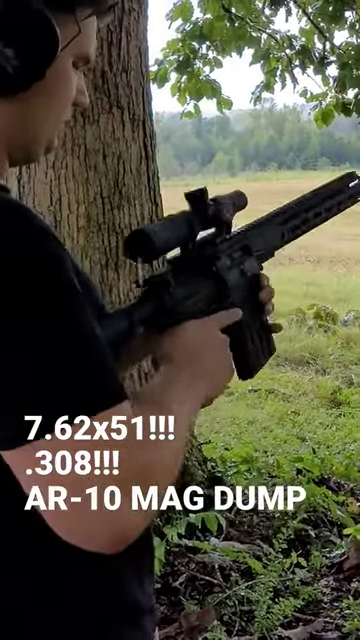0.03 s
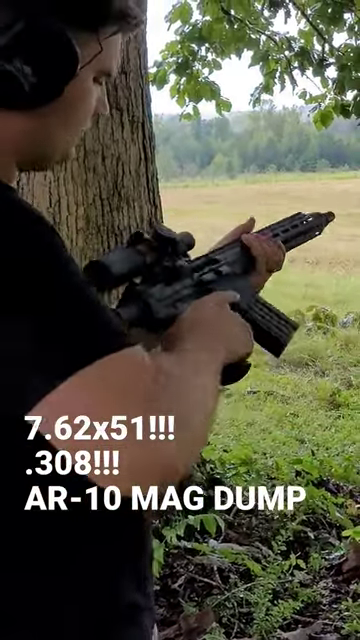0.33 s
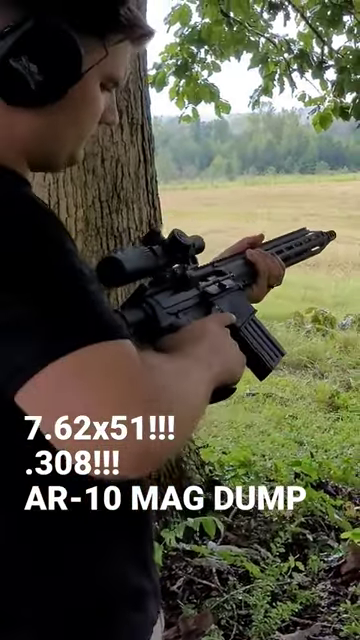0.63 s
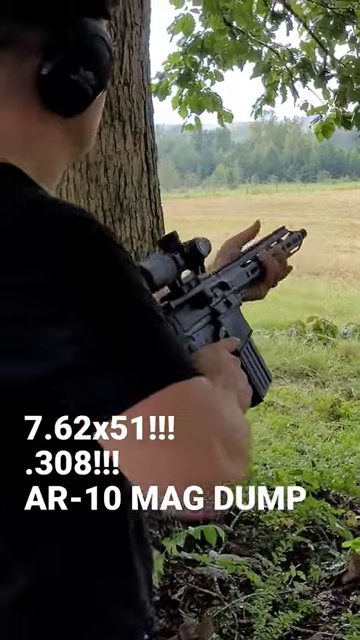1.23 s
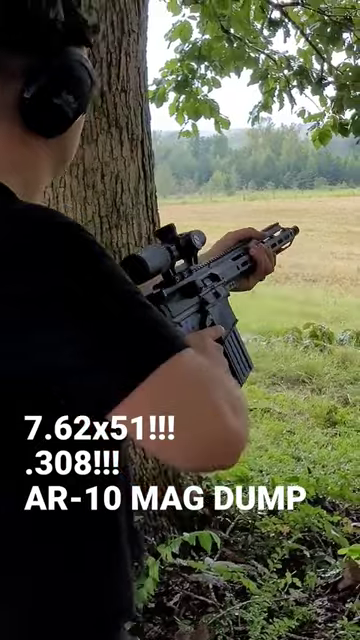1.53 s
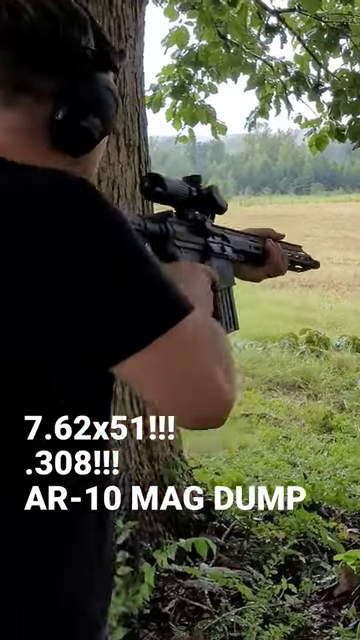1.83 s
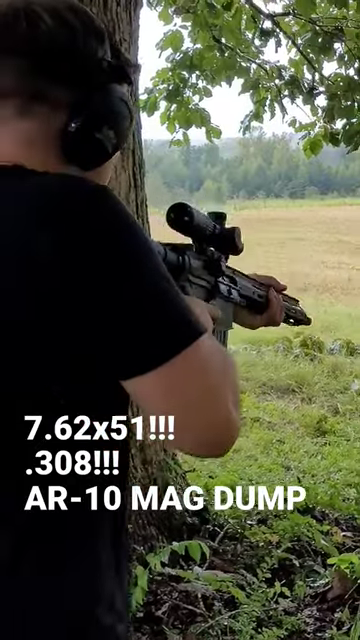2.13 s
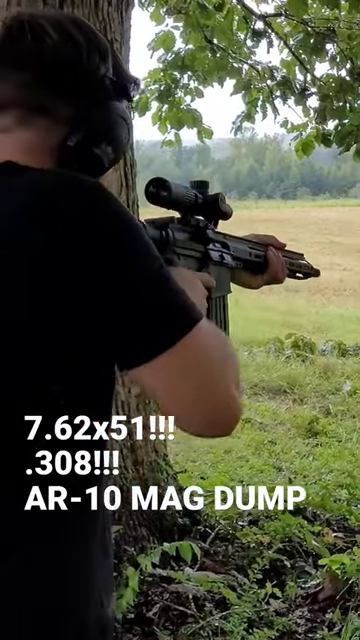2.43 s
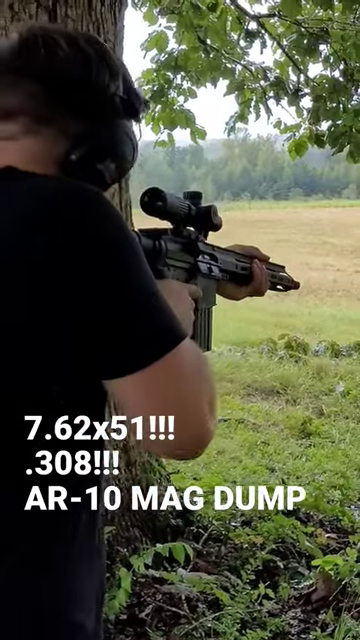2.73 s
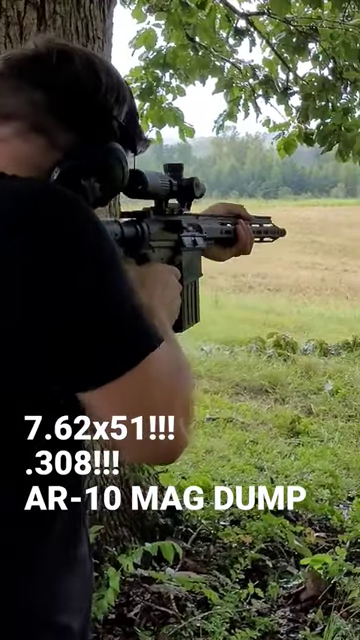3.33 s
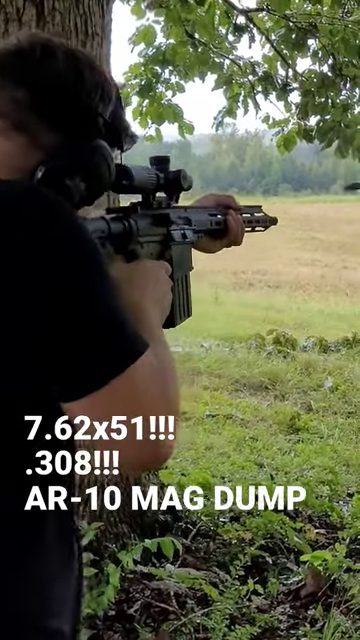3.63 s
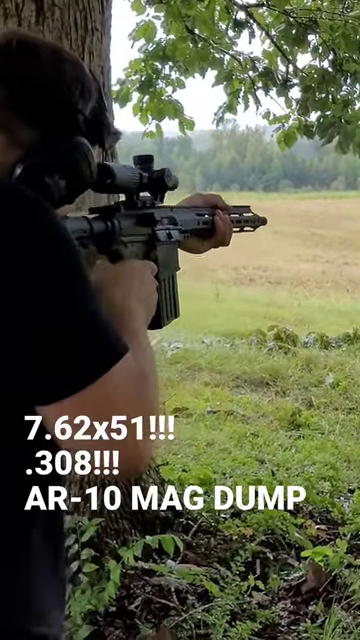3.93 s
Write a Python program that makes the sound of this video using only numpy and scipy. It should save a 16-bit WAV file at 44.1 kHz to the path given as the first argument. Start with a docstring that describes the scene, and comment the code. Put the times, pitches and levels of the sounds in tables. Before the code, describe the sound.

Five rapid rifle shots blast close by at the edge of a field, overloading the microphone. Before them, the bolt slams shut with a steel ring, followed by faint handling clicks and shirt rustle over quiet outdoor air.

```python
"""Five fast rifle shots, close by, under a tree at the edge of a field. Each blast comes back from
ground and trees as thumps, rumble and a dense roar, and overloads a microphone with two closely
spaced ports. Before the shots the bolt slams home and the steel rings, then hands and shirt shift
as the rifle is shouldered. Faint outdoor air lies under it all."""
import sys
import numpy as np
from scipy import signal
from scipy.fft import rfft, irfft
from scipy.io import wavfile

SR = 44100
rng = np.random.default_rng(int(sys.argv[2]) if len(sys.argv) > 2 else 0)


def master_out(mix):
    """Clip the mix to full scale and print it as 16-bit PCM to the path in sys.argv[1]."""
    frames = np.transpose(np.atleast_2d(mix))
    ceiling = np.clip(frames, -1, 1)
    pcm = np.round(ceiling * 32767).astype(np.int16)
    wavfile.write(sys.argv[1], SR, pcm)


N = 176400

# spectrum of the air over the field (frequency [Hz], level [dB])
AIR_SPECTRUM = [(15, -27), (25, -11.5), (69, 2.5), (119, -2), (281, -11.5), (782, -9.5), (970, -14.5),
                (1340, -11), (2300, -17.5), (6920, -26.5), (12500, -24), (14300, -25), (15500, -34)]
# level of the air, a little lower for a while after the bolt (time [s], level [dB])
AIR_LEVELS = [(.3, -51.5), (.6, -52), (.9, -52), (3.3, -50.5)]
# spectrum of hands and shirt (frequency [Hz], level [dB])
RUSTLE_SPECTRUM = [(150, -17), (500, -1), (1200, -1.5), (2400, 0), (4000, -2.5), (7000, -10.5), (10000, -7),
                   (15500, -28.5)]
# swells of the rustle (time [s], level [dB])
RUSTLE_LEVELS = [(.4, -76), (.5, -65), (.545, -50), (.6, -61), (.72, -59), (.82, -54), (.98, -55.5),
                 (1.06, -53.5), (1.19, -56), (1.27, -47.5), (1.39, -59), (1.49, -50.5), (1.56, -54.5),
                 (1.76, -56.5), (1.89, -48.5), (1.97, -52), (2.11, -57), (2.19, -45), (2.27, -53),
                 (2.54, -54.5), (2.63, -53.5), (2.72, -52), (2.96, -55), (3.04, -51.5), (3.15, -59),
                 (3.3, -52)]
# handling clicks (time [s], level [dB], centre [Hz], t60 [s], left minus right [dB])
HANDLING_CLICKS = [(0.3407, -30.5, 940, 0.0093, -6), (.343, -36.5, 330, 0.016, -7),
                   (.358, -44, 3000, .03, 0), (.7515, -40, 4540, .009, -3), (.805, -45.5, 1000, .02, 2),
                   (1.033, -36.5, 3420, .012, 3), (1.043, -47.5, 1500, .03, 2),
                   (1.121, -35, 3700, .014, -3), (1.262, -43, 2090, .06, 4), (1.267, -42, 9100, .06, -1),
                   (1.304, -42.5, 3500, 0.031, -5), (1.464, -45.5, 2200, .02, -2),
                   (1.857, -44, 1500, 0.033, 1), (1.885, -44, 1400, .05, 3), (2.196, -26, 1700, .014, -2),
                   (2.204, -42, 1500, .06, 0), (2.335, -41.5, 3470, .03, -2),
                   (2.467, -29, 1500, 0.011, 5.5), (2.6719, -38, 1900, .018, 0),
                   (3.026, -38.5, 8100, 0.05, -1), (3.238, -37.5, 1000, 0.013, -7),
                   (3.26, -43, 5500, 0.027, -1)]
# blows of the bolt: catch, cartridge feeding, lock-up (time [s], level [dB], t60 [s])
BOLT_BLOWS = [(.003, -7, 0.019), (.017, -17, 0.25), (.024, -14.5, 0.12), (0.0387, -10.5, 0.093),
              (.051, -17, 0.11), (.058, -18.5, 0.23), (0.11, -32, 0.14)]
# spectra of a blow's clash and its bright tail (frequency [Hz], level [dB])
CLASH_SPECTRUM = [(150, -24), (400, -21.5), (800, -5), (1200, -9), (1700, 2), (2700, 1), (4500, -1.5),
                  (6300, -3.5), (8000, -2), (11000, -4.5), (16000, -4.5)]
TAIL_SPECTRUM = [(500, -30), (1400, -21), (2200, -2.5), (5500, 2.5), (8000, -5.5), (15000, -7)]
# modes of the steel (frequency [Hz], level [dB], t60 [s])
STEEL_MODES = [(1820, -1, 0.1), (2330, -1.5, 0.14), (2630, -6, .22), (3055, -7, 0.23), (3704, -12.5, 0.52),
               (3946, -16, 0.49), (4170, -8.5, 0.25), (4600, -7, 0.17), (5238, -2, .5), (5510, -15, .2),
               (5740, -15, 0.63), (5997, -10, 0.52), (7680, -2, .12), (9790, -17, .2), (10627, -19, 0.42)]
# hollow knocks of magazine and stock (time [s], level [dB], frequency [Hz], t60 [s], rise [s])
HOLLOW_KNOCKS = [(.004, -25, 970, .04, .001), (.024, -20, 790, .08, .004), (.029, -10, 880, .016, .002),
                 (.042, -33, 560, .04, .003), (.064, -32, 380, .07, .004), (.0645, -35, 210, .025, .002)]
# the shots (time [s], level [dB], treble [dB], rise [s])
RIFLE_SHOTS = [(3.338, 1.5, 2, 0.015), (3.491, 0, -0.45, .002), (3.6493, 0, -0.5, 0.00084),
               (3.787, -1, 0.4, 0.0022), (3.945, -0.5, -1, 0.0024)]
# thumps of one blast and its echoes (delay [s], level [dB], centre [Hz])
BLAST_THUMPS = [(.009, -5.5, 219), (.0145, -18.5, 300), (0.0466, -5, 204), (.053, -18, 109),
                (0.0699, -12, 185), (.109, -13, 170), (0.1451, -9, 150)]
# spectra of the blast's low, middle and high layers (frequency [Hz], level [dB])
RUMBLE_SPECTRUM = [(18, -36), (32, -11), (52, 5.5), (68, 2.5), (88, 3), (120, -12), (170, 1), (230, 4.5),
                   (285, -7), (335, -1), (500, -12), (900, -25), (2000, -57)]
ROAR_SPECTRUM = [(200, -10.5), (450, 2), (800, 1), (1300, 2), (2300, -2.5), (3100, -2), (4500, -10.5),
                 (8000, -16.5), (16000, -30)]
CRACK_SPECTRUM = [(600, -30), (2000, -3.5), (3500, 3), (6000, 2), (9000, 1.5), (13000, 1), (16000, -1.5)]

PORT_LAG_S, CLICK_LAG_S = .00043, .0001  # right port behind left


def undb(db):
    return 10 ** (np.asarray(db) / 20)


def colour(x, points):
    """Filter by a spectrum of (frequency [Hz], level [dB]) points; rms 1."""
    hz, db = np.array(points, float).T
    f = np.maximum(np.fft.rfftfreq(x.shape[-1], 1 / SR), 1)
    gain = undb(np.interp(np.log(f), np.log(hz), db))
    filtered = irfft(rfft(x) * gain, x.shape[-1])
    return filtered / np.sqrt(np.mean(filtered ** 2))


def ports(x, lag_s):
    """The sound reaches the microphone's left port first."""
    return np.array([x, np.roll(x, int(lag_s * SR))])


def pan(db):
    return undb(np.array([[db], [-db]]) / 2)


def noise(points, alike, size, lag_s=PORT_LAG_S):
    """Coloured noise at both ports; the share 'alike' is common to them."""
    white = rng.standard_normal((3, size))
    return colour(np.sqrt(alike) * ports(white[2], lag_s) + np.sqrt(1 - alike) * white[:2], points)


def add(out, start, x):
    """Mix x in at start [s]."""
    i = int(start * SR)
    n = min(x.shape[-1], N - i)
    out[:, i:i + n] += x[..., :n]


def fade(t, t60):
    return np.exp(-np.log(1000) * t / t60)


def envelope(t, rise_s, hold_s, fall_db_s, build_db_s=0):
    """Rise to time 0, build through the hold, then die away."""
    attack = np.exp(-(np.minimum(t, 0) / rise_s) ** 2)
    build_db = -build_db_s * np.clip(hold_s - t, 0, hold_s)
    return attack * undb(build_db - fall_db_s * np.maximum(t - hold_s, 0))


def flutter(t, rate_hz):
    """Random values of spread near 1, joined by straight lines."""
    steps = rng.standard_normal(len(t) // 8)
    return 1.11 * np.interp(t * rate_hz, np.arange(len(steps)), steps)


def field_air():
    """Open air all round the microphone: a low rumble under faint hiss."""
    db = np.interp(np.arange(N) / SR, *np.array(AIR_LEVELS).T)
    return undb(db) * noise(AIR_SPECTRUM, alike=0.54, size=N)


def rustle():
    """Hands and shirt rub near the microphone, in millisecond grains of uneven strength."""
    grain = SR // 1000
    grain_db = 1.8 * np.minimum(rng.exponential(size=N // grain + 1), 4)
    grains = rng.standard_normal((2, N)) * undb(np.repeat(grain_db, grain)[:N])
    db = np.interp(np.arange(N) / SR, *np.array(RUSTLE_LEVELS).T)
    return undb(db) * colour(grains, RUSTLE_SPECTRUM)


def clicks():
    """The rifle's parts give short damped clicks, left and right, as it is shouldered."""
    age, out = np.arange(SR // 8) / SR, np.zeros((2, N))
    for start, db, hz, t60, pan_db in HANDLING_CLICKS:
        body = [(hz / 8, -20), (hz / 2, -3), (hz, 0), (hz * 1.26, -3), (hz * 2, -14), (hz * 6, -28)]
        click = noise(body, alike=0.43, size=len(age), lag_s=CLICK_LAG_S)
        decay = fade(age, t60) + undb(-25) * fade(age, t60=0.13)
        add(out, start, undb(db) * click * decay * pan(pan_db))
    return out


def bolt():
    """Each blow clashes, chatters, rings the steel and leaves a bright tail; hollow parts knock."""
    t, out = np.arange(SR) / SR, np.zeros((2, N))
    chatter_db, tail_db, steel_db = 3, -15, -16.5
    clash_rise_s, ring_rise_s = 0.00064, 0.0014
    attack = 1 - np.exp(-t / clash_rise_s)
    for start, db, t60 in BOLT_BLOWS:
        chatter = undb(chatter_db * flutter(t, rate_hz=695))
        clash = noise(CLASH_SPECTRUM, alike=0.13, size=SR, lag_s=CLICK_LAG_S) * fade(t, t60)
        tail = undb(tail_db) * noise(TAIL_SPECTRUM, alike=0.067, size=SR) * fade(t, t60=0.47)
        add(out, start, undb(db) * (clash * chatter * attack + tail) * pan(db=-1.5))
    for hz, mode_db, t60 in STEEL_MODES:
        energy = sum((undb(db) * envelope(t - start, ring_rise_s, 0, 60 / t60)) ** 2
                     for start, db, _ in BOLT_BLOWS)
        phase = rng.random() + 0.29 * rng.random((2, 1))  # in cycles, one for each port
        ring = np.sqrt(energy) * np.sin(2 * np.pi * (hz * t + phase))
        add(out, 0, undb(steel_db + mode_db) * ring)
    for start, db, hz, t60, rise in HOLLOW_KNOCKS:
        age = t - start
        add(out, 0, undb(db) * np.sin(2 * np.pi * hz * age) * envelope(age, rise, 0, 60 / t60))
    return out


def tree_scatter(points, same, alike):
    """Scattered noise for each shot; the share 'same' takes the same paths every time."""
    common = noise(points, alike, SR)
    return [np.sqrt(same) * common + np.sqrt(1 - same) * noise(points, alike, SR) for _ in RIFLE_SHOTS]


def thumps(age):
    """A blast and its echoes reach the microphone as pressure pulses, each a little uneven in level."""
    pulses, spread_db = 0, .8
    for delay, db, hz in BLAST_THUMPS:
        gain = undb(db + spread_db * rng.standard_normal())
        phase_squared = (np.pi * hz * (age - delay)) ** 2
        pulses += gain * (1 - 2 * phase_squared) * np.exp(-phase_squared)
    return ports(pulses, PORT_LAG_S)


def shots():
    """Each blast gives thumps, a ground rumble, a roar and a bright crack, scattered by the trees."""
    out, lead_s = np.zeros((2, N)), .05  # lead leaves room for the rise
    age = np.arange(SR) / SR - lead_s
    rumble_db, roar_db, crack_db = -15, -16.5, -14
    rumbles = tree_scatter(RUMBLE_SPECTRUM, same=.9, alike=.8)
    roars = tree_scatter(ROAR_SPECTRUM, same=0.37, alike=0.46)
    cracks = tree_scatter(CRACK_SPECTRUM, same=0.21, alike=0.04)
    for (start, db, treble_db, rise), rumble, roar, crack in zip(RIFLE_SHOTS, rumbles, roars, cracks):
        low = rumble * envelope(age, rise, hold_s=0.06, fall_db_s=64, build_db_s=114)
        middle = roar * envelope(age, rise, hold_s=0.095, fall_db_s=165)
        high = crack * envelope(age, rise, hold_s=0.041, fall_db_s=110, build_db_s=75)
        blast = thumps(age) + undb(rumble_db) * low
        blast += undb(roar_db + treble_db / 2) * middle * pan(db=.1)
        blast += undb(crack_db + treble_db) * high * pan(db=-1.5)
        add(out, start - lead_s, undb(db) * blast)
    return out


def scene():
    return shots() + bolt() + clicks() + rustle() + field_air()


def record(dry):
    """The overloaded microphone rounds the loudest peaks; the top is cut."""
    drive, top_hz = 0.5, 15700
    rounded = np.tanh(drive * dry) / drive
    return signal.sosfilt(signal.ellip(10, .2, 70, top_hz, fs=SR, output="sos"), rounded)


dry = scene()
out = record(dry)
master_out(out)
```